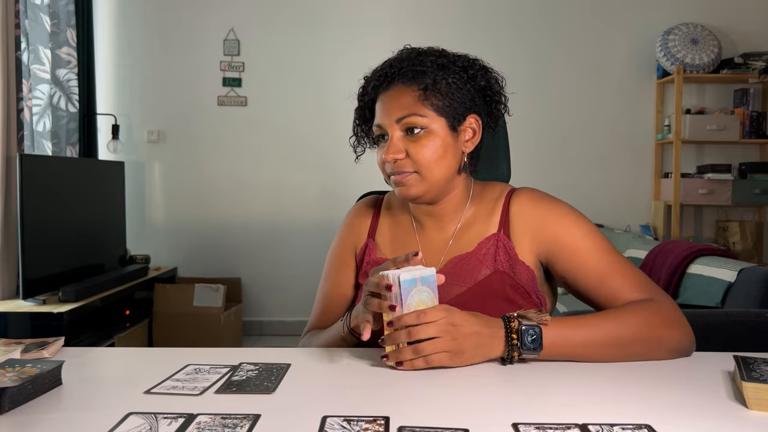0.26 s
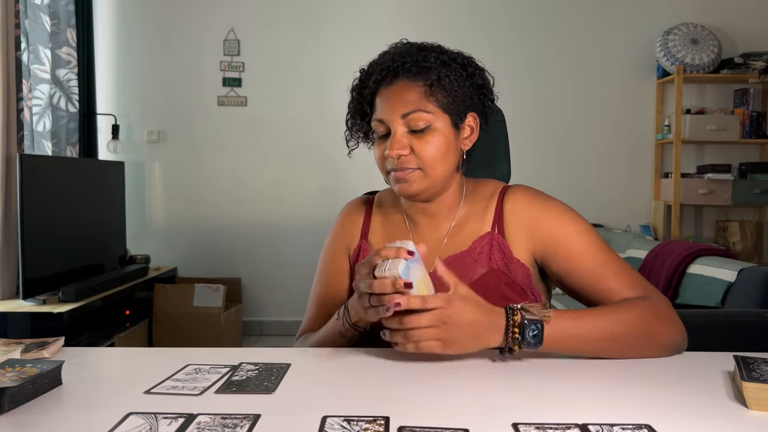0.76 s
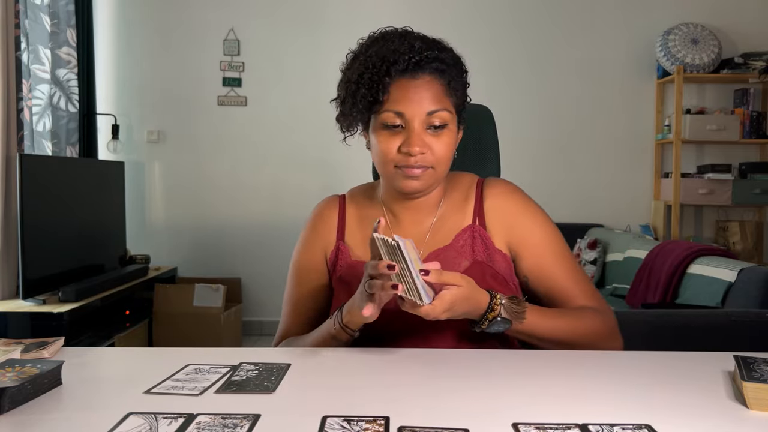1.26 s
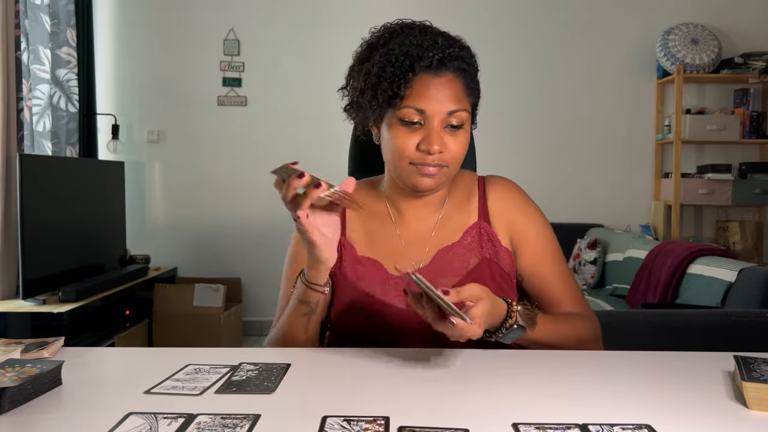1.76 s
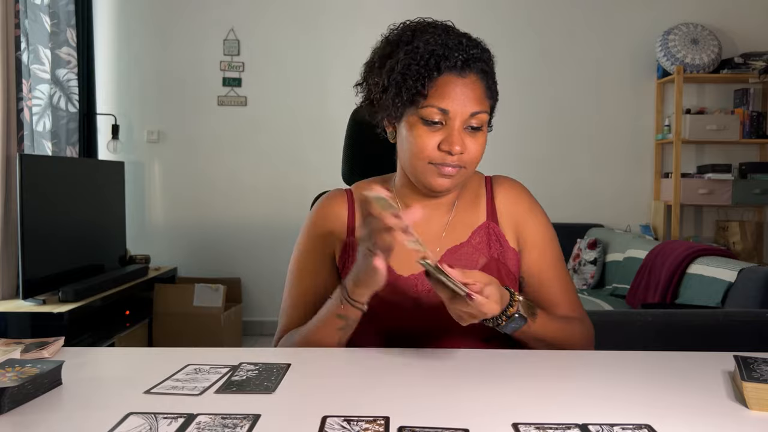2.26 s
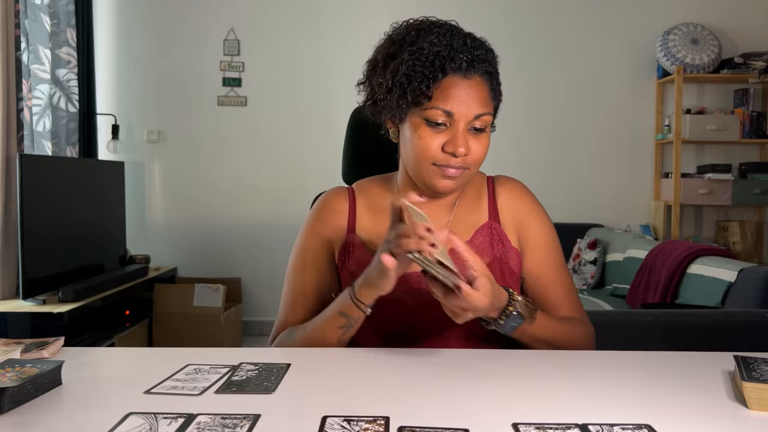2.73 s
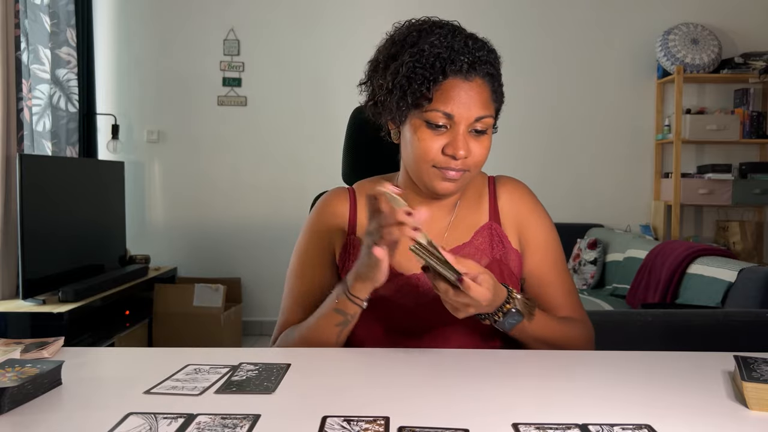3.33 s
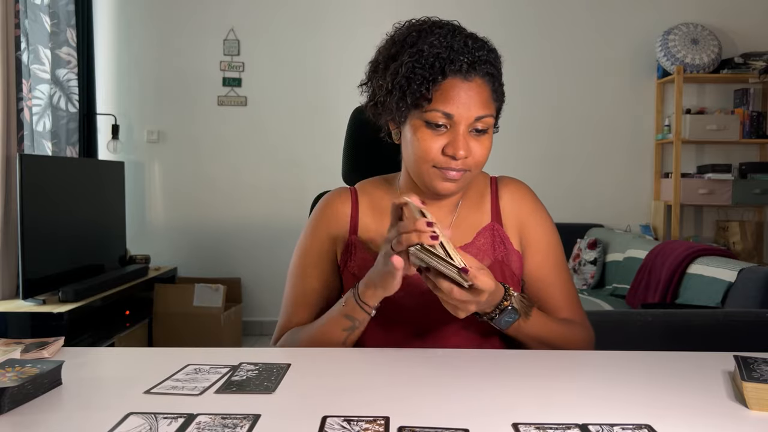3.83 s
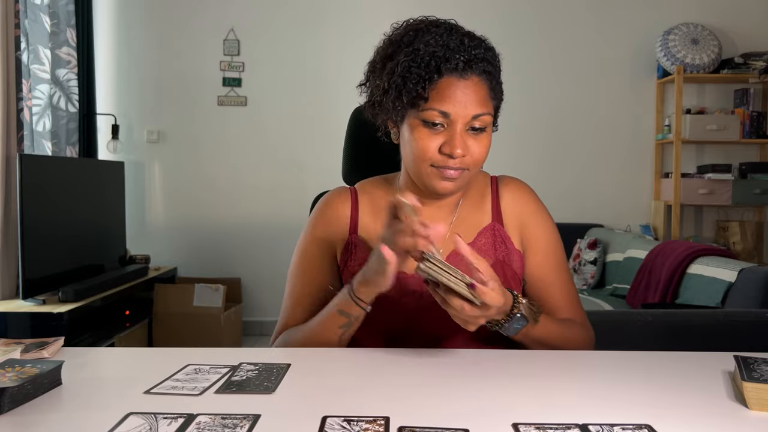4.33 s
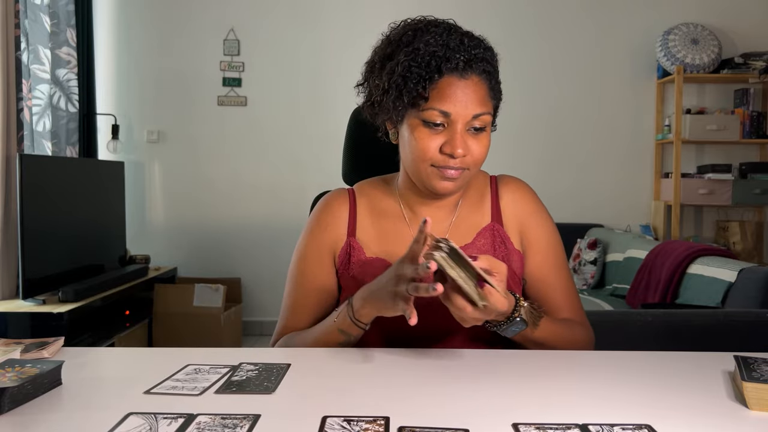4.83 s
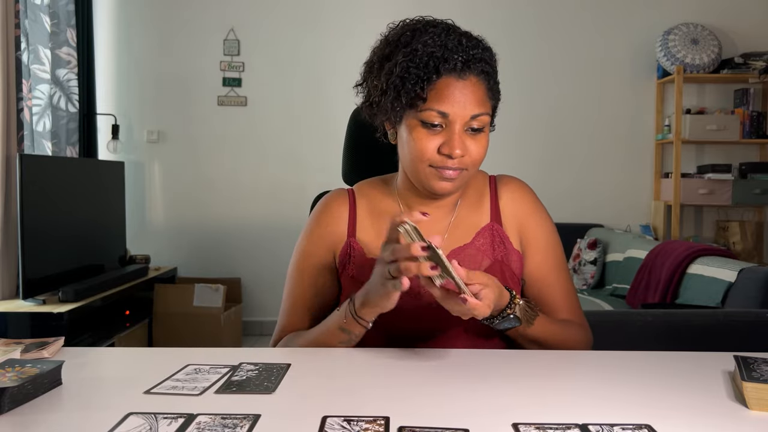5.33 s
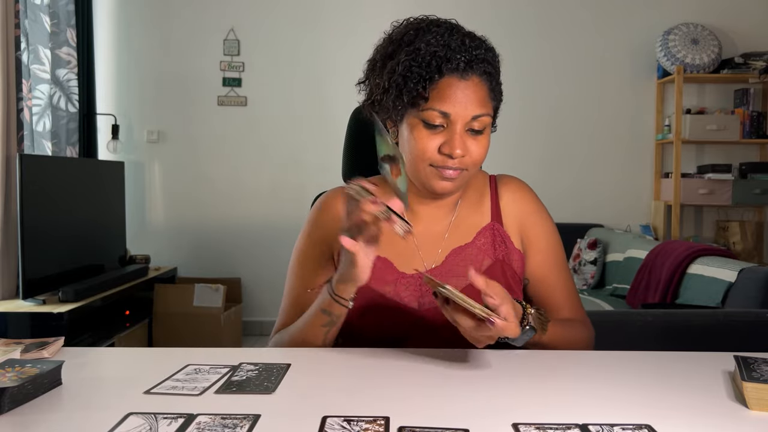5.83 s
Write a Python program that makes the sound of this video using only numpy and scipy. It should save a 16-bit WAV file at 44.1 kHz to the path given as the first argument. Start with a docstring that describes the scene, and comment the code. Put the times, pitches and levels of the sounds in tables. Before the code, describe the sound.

Soft clacks and dull rubbing of a squared deck, near silence, then a brisk uneven overhand shuffle of large cards in a small bare room.

```python
"""Overhand shuffle at a table

In a bare-walled living room, a deck of large cards is knocked square on a table, then shuffled overhand.
Strokes are grainy friction noise; packets slap down as a palm thud, an air-pocket pop and a paper crack.
Decaying noise and a few near reflections make the room ring after every slap and knock; the table booms.
A stereo pair of microphones hears the direct contacts a little earlier on the right.
A low rumble of noise and standing waves lies underneath, almost gone before the shuffle, then swelling."""
import sys
import numpy as np
from scipy import signal
from scipy.fft import rfft, irfft, next_fast_len
from scipy.io import wavfile
from scipy.ndimage import map_coordinates

SR = 44100
rng = np.random.default_rng(int(sys.argv[2]) if len(sys.argv) > 2 else 0)


def master_out(mix):
    """Clip the mix to full scale and print it as 16-bit PCM to the path in sys.argv[1]."""
    frames = np.transpose(np.atleast_2d(mix))
    ceiling = np.clip(frames, -1, 1)
    pcm = np.round(ceiling * 32767).astype(np.int16)
    wavfile.write(sys.argv[1], SR, pcm)


N = 268503
TIME = np.arange(N) / SR
LEFT_LAG_SAMPLES = 2    # sound reaches the left side this much later
SLIDE_GATE_DB = -62     # loose cards and faint ticks need at least this stroke level
MIDDLE_POCKET_HZ = 1000

# Packets landing on the deck. Each row: start in seconds, air pocket in Hz, pocket level in dB,
# card crack level in dB; both levels are relative.
SLAPS = [(1.7357, 700, -32, -46), (1.7503, 1210, -34.5, -29), (1.9683, 1170, -32.5, -33.5),
         (2.018, 980, -29.5, -31.5), (2.066, 1250, -42, -37), (2.2553, 1070, -31, -40),
         (2.2933, 1110, -34, -30.5), (2.3531, 1190, -26.5, -23.5), (2.522, 1130, -23, -22),
         (2.5264, 1080, -50, -27), (2.6333, 720, -33, -37), (2.6443, 840, -32, -48),
         (2.8653, 970, -36, -28), (2.8705, 1120, -32, -27), (2.8912, 820, -26.5, -38),
         (3.0758, 1150, -19.5, -18), (3.1872, 700, -34.5, -30.5), (3.3463, 1180, -42, -28.5),
         (3.3598, 750, -26.5, -27.5), (3.3983, 1060, -32, -24.5), (3.5912, 1100, -25.5, -24.5),
         (3.6704, 1270, -55, -31.5), (3.7006, 980, -28.5, -30), (3.8568, 930, -39, -20.5),
         (3.8649, 1260, -21.5, -31), (3.8872, 1240, -18, -22), (3.9676, 1030, -30, -34),
         (4.1354, 920, -29, -28.5), (4.1538, 800, -21.5, -24), (4.1624, 990, -35, -26),
         (4.2466, 990, -38, -30), (4.4032, 760, -33, -33), (4.4269, 1110, -31, -41),
         (4.5236, 1130, -25.5, -27.5), (4.6831, 1050, -8.5, -14.5), (4.6885, 950, -25.5, -18.5),
         (4.7346, 750, -27, -26.5), (4.7636, 960, -18, -20), (5.4513, 660, -47, -43),
         (5.4761, 690, -21.5, -31), (5.4839, 1140, -16, -20), (5.4895, 900, -19, -23.5),
         (5.6728, 930, -25.5, -29.5), (5.6861, 1040, -14.5, -19), (5.6932, 1210, -38, -16.5),
         (5.7012, 960, -16, -32), (5.7145, 930, -23, -38), (5.7683, 1230, -32, -25),
         (5.8019, 1010, -45, -26.5), (5.9497, 720, -19, -15), (6.0359, 820, -25.5, -23)]
# Bending resonances of a loose packet. Each row: pitch in Hz, width in Hz, relative level in dB.
PACKET_MODES = [(1790, 240, 5.5), (2385, 500, 5), (3160, 820, 5), (5540, 940, 3)]


def slaps(slide):
    """Packets and loose cards land, squeezing out air and ringing in broad bending resonances."""
    landings = [*SLAPS, *loose_cards(slide)]
    return card_hits(landings, PACKET_MODES, crack_top_hz=6070, contact_s=.0011, patter=0.55,
                     settle_s=.004, settle_db=-20, pocket_width_hz=520, pocket_db=-0.5,
                     thud_db=-7, crack_db=0.5, tick_db=-11)


LOOSE_CARDS_PER_S, LOOSE_CARD_DB = 11, -5.5   # rate while cards slide; level relative to the sliding


def loose_cards(slide):
    """Light landings at random moments, following the strength of the sliding; rows as in SLAPS."""
    sliding_now = slide > from_db(SLIDE_GATE_DB)
    at = np.flatnonzero((rng.random(N) < LOOSE_CARDS_PER_S / SR) & sliding_now)
    pitch, air, crack = rng.standard_normal((len(at), 3)).T
    pocket_hz = MIDDLE_POCKET_HZ * np.exp(.15 * pitch)
    db = 20 * np.log10(slide[at]) + LOOSE_CARD_DB
    return list(zip(TIME[at], pocket_hz, db + 3 * air, db - 1 + 3 * crack))


HIT_S = .004              # a part at 0 dB has the energy of rms 1 over this time
THUD_DB_PER_OCTAVE = 11   # a bigger, lower air pocket also thuds more in the palm


def card_hits(rows, modes, crack_top_hz, contact_s, patter, settle_s, settle_db,
              pocket_width_hz, pocket_db, thud_db, crack_db, tick_db):
    """A packet lands: the palm thuds, trapped air pops, cards crack, edges tick, loose cards settle."""
    out, t = np.zeros(N), TIME[:SR // 20]
    firm = (t == 0).astype(float)
    envelope = np.exp(-t / contact_s) + from_db(settle_db) * np.exp(-t / settle_s)
    sharp = np.exp(-t / .0004)
    crack_top = signal.butter(8, crack_top_hz, fs=SR, output="sos")
    for s, pocket_hz, pocket, crack in rows:
        patter_noise, tick_noise = rng.standard_normal((2, len(t)))
        # one firm push plus the patter of single cards
        push = firm + patter * energy_one(patter_noise * envelope)
        # every grip tunes the packet a little differently
        stiffness = 1 + 0.043 * rng.standard_normal()
        bend = np.zeros(len(t))
        for k, (hz, width_hz, db) in enumerate(modes):
            gain = (-1) ** k * from_db(db + 2 * rng.standard_normal())
            bend += gain * resonance(push, hz * stiffness, width_hz)
        bend = signal.sosfilt(crack_top, bend)
        thud = pocket + THUD_DB_PER_OCTAVE * np.log2(MIDDLE_POCKET_HZ / pocket_hz)
        palm = from_db(thud + thud_db) * energy_one(band(push, 300, 796))
        pop = resonance(push, pocket_hz, pocket_width_hz)
        air = from_db(pocket + pocket_db) * energy_one(band(pop, 471, 1300))
        paper = from_db(crack + crack_db) * energy_one(band(bend, 1400, 4800))
        tick = energy_one(tick_noise * sharp) + firm
        edges = from_db(crack + tick_db) * energy_one(band(tick, 5000, 16000))
        add(out, s, np.sqrt(HIT_S * SR) * (palm + air + paper + edges))
    return out


# Strokes of the hand, cards sliding over each other. Each row: landing time in seconds, rise in seconds,
# hold in seconds, card friction level in dB, palm rub level in dB; both levels are relative.
STROKES = [(1.706, 0.054, 0.017, -43.5, -65), (1.744, 0.056, 0.0057, -41.5, -39),
           (1.963, 0.025, 0.12, -40.5, -38), (2.248, .02, 0.13, -35, -37.5), (2.522, 0.01, 0.13, -35, -35),
           (2.792, 0.025, 0.11, -34, -37.5), (3.065, 0.016, 0.13, -31.5, -36.5),
           (3.317, 0.02, 0.098, -31.5, -34.5), (3.587, 0.0086, 0.15, -32.5, -33.5),
           (3.856, 0.01, .11, -33.5, -31.5), (4.135, 0.019, 0.12, -32.5, -34),
           (4.4, 0.0098, 0.14, -34.5, -39.5), (4.677, 0.0056, 0.05, -27, -27.5),
           (4.758, .006, .006, -31.5, -29.5), (4.927, 0.077, .12, -50, -48), (5.124, 0.12, .25, -58, -58),
           (5.445, 0.17, .03, -45.5, -45.5), (5.483, 0.043, 0.0053, -26.5, -26),
           (5.658, .015, 0.016, -41, -34.5), (5.684, 0.04, 0.1, -30, -29.5),
           (5.949, 0.0069, 0.006, -30, -28.5), (6.033, .02, 0.011, -47, -38.5)]
STROKE_RISE_DB = 36.5                        # swell over the rise time
STROKE_BITE_DB, STROKE_BITE_S = 4.1, 0.01    # extra grip as the packet lands, and its decay
STROKE_SAG_DB_PER_S, STROKE_EASE_DB = 14.5, 1   # steady sag, and a dip of pressure in mid-hold
SLIDE_RELEASE_DB_PER_S, PALM_RELEASE_DB_PER_S = 189, 149


def stroke_gains():
    """Friction and palm rub over time: every stroke rises, bites, eases in the middle and is released."""
    s, rise_s, hold_s, slide_db, palm_db = np.transpose(STROKES)[..., None]
    t = TIME[::20]   # a coarse clock is enough for gains
    age, hold_s = t - s, np.maximum(hold_s, 1 / SR)
    held = np.clip(age, 0, hold_s)
    released = np.maximum(age - hold_s, 0)
    rise = STROKE_RISE_DB * np.minimum(age, 0) / rise_s
    bite = STROKE_BITE_DB * np.exp(-held / STROKE_BITE_S)
    sag = STROKE_SAG_DB_PER_S * held + STROKE_EASE_DB * np.sin(np.pi * held / hold_s) ** 2
    shape = rise + bite - sag

    def strongest(db, release):
        """The strongest stroke sets the gain at each moment."""
        loudest_db = np.max(db + shape - release * released, axis=0)
        return np.interp(TIME, t, from_db(loudest_db))

    return strongest(slide_db, SLIDE_RELEASE_DB_PER_S), strongest(palm_db, PALM_RELEASE_DB_PER_S)


# Colour of card faces sliding. Each row: frequency in Hz, relative gain in dB.
CARD_SLIDE = [(300, -15.5), (900, -18.5), (1600, -4.5), (2400, -2), (3500, -3), (4500, 2.5), (6000, 1),
              (8200, 3.5), (12000, -3), (16000, -14.5)]
# Colour of the deck rubbing in the palm. Each row: frequency in Hz, relative gain in dB.
PALM_RUB = [(100, -13.5), (250, -3), (500, -2), (800, -5.5), (1200, -4.5), (1600, 1), (3000, -22)]


def sliding(slide, palm, slide_db, palm_db):
    """Card faces swish over each other while the deck rubs in the palm."""
    swish = from_db(slide_db) * slide * friction(CARD_SLIDE, grain_db=5.0, catches_per_s=16000)
    # the card edges grip and slip, so the top of the hiss comes in quick surges
    surge_times = np.arange(300) / 45
    surge = from_db(np.interp(TIME, surge_times, rng.normal(-2, 4.5, 300)))
    top = signal.sosfilt(signal.butter(1, 9000, "high", fs=SR, output="sos"), swish)
    swish = swish + (surge - 1) * top
    rub = from_db(palm_db) * palm * friction(PALM_RUB, grain_db=2.0, catches_per_s=4000)
    return spread(swish, likeness=0.19) + spread(rub, likeness=0.33)


# Single card corners snapping free. Each row: start in seconds, relative level in dB.
FLICKS = [(.858, -34.5), (1.994, -33.5), (2.351, -23), (2.521, -26), (2.595, -19), (2.936, -26.5),
          (3.075, -28), (3.589, -23), (4.293, -25), (4.763, -20), (5.301, -38)]
FLICK_DECAY_S = 0.0013   # a corner buzzes for a moment as it snaps free
FAINT_TICKS_PER_S = 26   # while the cards slide


def flicks(slide, snap_db, faint_db):
    """Corners snap free in short bright bursts; faint ones tick at random, louder in strong sliding."""
    sliding_now = slide > from_db(SLIDE_GATE_DB)
    born = (rng.random(N) < FAINT_TICKS_PER_S / SR) & sliding_now
    clicks = born * from_db(faint_db + rng.uniform(-9, 0, N)) * slide ** .35
    t = TIME[:SR // 50]
    for s, db in FLICKS:
        buzz = rng.standard_normal(len(t)) * np.exp(-t / FLICK_DECAY_S)
        add(clicks, s, from_db(db + snap_db) * energy_one(buzz))
    bright = signal.butter(2, 8000, "high", fs=SR, output="sos")
    return signal.sosfilt(bright, clicks + 1e-18)


# The hand lifts a packet off the deck. Each row: time of the peak in seconds, pitch in Hz, level in dB.
SCUFFS = [(1.597, 1050, -79), (1.674, 1080, -37), (5.342, 2110, -51.5), (5.41, 1110, -42.5),
          (5.452, 2900, -40.5)]
SCUFF_RISE_S, SCUFF_DECAY_S, SCUFF_WIDTH_HZ = 0.015, 0.029, 630   # width of each of two resonances


def scuffs():
    """Brief soft rubbing that swells and fades in the hollow between packet and deck."""
    out = np.zeros((2, N))
    for s, hz, db in SCUFFS:
        before, after = np.minimum(TIME - s, 0), np.maximum(TIME - s, 0)
        envelope = np.exp(-(before / SCUFF_RISE_S) ** 2 - after / SCUFF_DECAY_S)
        hollow = resonance(rng.standard_normal((2, N)), hz, SCUFF_WIDTH_HZ)
        hollow = resonance(hollow, hz, SCUFF_WIDTH_HZ)
        out += from_db(db) * envelope * rms_one(hollow)
    return spread(out, likeness=0.67)


# The deck's edges knocked on the table. Each row: start in seconds, air pocket in Hz, pocket level in dB, #
# card crack level in dB; both levels are relative.
KNOCKS = [(.0051, 1210, -30, -27), (.0317, 1170, -40, -28), (.085, 700, -32, -32), (.0921, 720, -30, -33),
          (.1214, 760, -25.5, -35), (.1245, 1080, -21, -48), (.1363, 1060, -21.5, -28.5),
          (.2255, 1030, -32.5, -31), (.2415, 1110, -30.5, -26), (.25, 950, -30, -28),
          (.2843, 1180, -34, -31), (.2912, 1040, -31, -24.5), (.3101, 1140, -35, -38.5),
          (.3528, 1000, -34, -32), (.36, 1020, -38, -28), (.4841, 1130, -36.5, -32.5),
          (.504, 1000, -34, -30), (.5684, 1090, -41, -33.5), (.5818, 1060, -35, -30),
          (.7272, 1080, -49, -40.5)]
# Bending resonances of the tightly held deck. Each row: pitch in Hz, width in Hz, relative level in dB.
DECK_MODES = [(1670, 120, 6), (2100, 170, 6), (2385, 120, 6), (3060, 460, -5.5), (3720, 140, -13.5)]


def knocks():
    """The deck's edges strike in very short contacts; held tight, it bends in narrower resonances."""
    return card_hits(KNOCKS, DECK_MODES, crack_top_hz=4300, contact_s=0.00023, patter=0.77,
                     settle_s=0.0031, settle_db=-17.5, pocket_width_hz=500, pocket_db=2.5,
                     thud_db=-7, crack_db=1, tick_db=-42.5)


# Cards rubbing as the deck is squared, dull in the treble. Each row: time in seconds,
# friction level in dB, crisp edge hiss level in dB; both levels are relative.
SQUARING = [(0.0, -21.5, -32), (.19, -31, -56), (.35, -32.5, -55.5), (.47, -47, -81), (.57, -38, -73),
            (.64, -42.5, -63), (.8, -57.5, -65.5), (.95, -59.5, -61), (1.13, -86.5, -97)]
# Colour of the dull rubbing. Each row: frequency in Hz, relative gain in dB.
DULL_RUB = [(100, -48.5), (330, -3), (550, -2), (1050, 2.5), (1500, 8.5), (2100, 0.5), (3800, -7),
            (4600, -16), (6500, -30.5), (10000, -65.5)]
# Colour of the crisp card edges. Each row: frequency in Hz, relative gain in dB.
EDGE_HISS = [(2500, -8.5), (4500, 7.5), (6000, -0.5), (7500, -10), (9500, -5), (12000, -18.5),
             (14000, -29.5), (16000, -42)]


def squaring(rub_db, hiss_db):
    """Dull, grainy rubbing and crisp edge hiss, fading unevenly as the deck is squared."""
    rub, hiss = gains_in_time(SQUARING)
    dull = from_db(rub_db) * rub * friction(DULL_RUB, grain_db=-0.5, catches_per_s=1700)
    crisp = from_db(hiss_db) * hiss * friction(EDGE_HISS, grain_db=3.5, catches_per_s=17000)
    return spread(dull + crisp, likeness=0.17)


# The deck bumps the table. Each row: start in seconds, relative level in dB.
BUMPS = [(0.12, -30), (0.244, -35), (0.369, -39)]
# Resonances of the table top. Each row: pitch in Hz, relative level in dB, undamped 60 dB decay in seconds.
TABLE_MODES = [(135.8, -6, 0.5), (315, 1, 0.16), (348, -10, 0.63), (618, -4.5, 0.24), (700, -7, 0.52)]
# the hands come to rest after each bump and damp the table: when it begins, and by how much
TABLE_FREE_S, TABLE_DAMPED_DB = .05, 8


def table_bumps(level_db):
    """The table top booms in decaying sine modes under the soft weight of the deck."""
    out, t = np.zeros(N), TIME[:SR]
    damping = np.clip(2 * (t / TABLE_FREE_S - 1), 0, 1)
    soft_onset = 1 - np.exp(-t / 0.006)
    for s, db in BUMPS:
        ring = np.zeros(len(t))
        for hz, mode_db, t60 in TABLE_MODES:
            gain = from_db(mode_db + rng.normal(0, 1))   # each bump excites the modes differently
            ring += gain * np.sin(2 * np.pi * hz * t) * np.exp(-np.log(1000) * t / t60)
        add(out, s, from_db(db + level_db) * ring * from_db(-TABLE_DAMPED_DB * damping) * soft_onset)
    return out


# Decay of the room. Each row: frequency in Hz, time to fall 60 dB in seconds.
ROOM_T60 = [(125, 0.3), (500, 0.56), (1200, 0.51), (3000, 0.43), (7000, 0.6), (14000, 0.1)]
# Strength of the room's tail. Each row: frequency in Hz, relative level in dB.
ROOM_COLOUR = [(125, 13.5), (500, -0.5), (1100, -3.5), (2200, -0.5), (5000, -2.5), (8000, 6), (12000, -2)]
# Left-right likeness of the tail. Each row: frequency in Hz, likeness from 0 to 1.
ROOM_LIKENESS = [(150, 0.45), (600, 0.15), (2000, 0.16), (6000, 0.24)]
# Near reflections off table, body and screen. Each row: delay in milliseconds, left level in dB,
# right level in dB; the treble is softened afterwards.
ECHOES = [(1.6, -22, -7), (2.4, -11.5, -29), (4.7, -27.5, -10.5), (7.3, -21, -8)]
SCATTER_TOP_HZ, SCATTER_PER_S = 4500, 3000


def room(x, early_db, tail_db, early_s):
    """Direct sound a little from the right, dull near reflections and scatter, then a diffuse tail."""
    t = TIME[:SR * 3 // 4]
    edges = np.geomspace(80, 18000, 13)
    white = rng.standard_normal((2, 2, len(t)))
    tail = np.zeros((2, len(t)))
    for k, (low, high) in enumerate(zip(edges, edges[1:])):
        hz = np.sqrt(low * high)
        decay = np.exp(-np.log(1000) * t / at_hz(ROOM_T60, hz))
        noise = spread(band(white[k % 2], low, high), at_hz(ROOM_LIKENESS, hz))
        tail += from_db(at_hz(ROOM_COLOUR, hz)) * noise * decay
    tail = energy_one(tail * (1 - np.exp(-t / .008)))
    bounces = rng.standard_normal((2, len(t))) * (rng.random((2, len(t))) < SCATTER_PER_S / SR)
    scatter = spread(bounces, likeness=1.0) * np.exp(-t / early_s) * (t > .002)
    near = from_db(early_db) * energy_one(scatter)
    for ms, left_db, right_db in ECHOES:
        lag = round(ms * SR / 1000)
        near[0, lag + LEFT_LAG_SAMPLES] += from_db(left_db)
        near[1, lag] += from_db(right_db)
    # skin and cloth soak up the treble of the near reflections, so bright ticks stay sharp
    near = signal.sosfilt(signal.butter(2, SCATTER_TOP_HZ, fs=SR, output="sos"), near)
    response = near + from_db(tail_db) * tail
    response[0, LEFT_LAG_SAMPLES] += 1   # direct sound
    response[1, 0] += 1
    return signal.fftconvolve(x[None], response, axes=1)[:, :N]


# Course of the low room background. Each row: time in seconds, relative level in dB.
RUMBLE_LEVEL = [(0.0, -59), (.36, -61), (.6, -77), (.9, -69.5), (1.08, -90.5), (1.74, -89), (1.9, -55),
                (2.45, -57.5), (2.8, -45.5), (4.1, -44.5), (6.09, -43)]
# Colour of the rumble. Each row: frequency in Hz, relative gain in dB.
RUMBLE_COLOUR = [(22, -37), (32, -39.5), (42, 4.5), (75, -6.5), (101, -1), (155, -7), (205, -1.5),
                 (300, -13), (450, -20.5), (700, -47.5), (2000, -40), (12000, -49)]
# Standing waves of the room. Each row: pitch in Hz, width in Hz, level relative to the rumble in dB.
ROOM_MODES = [(100.6, 5.2, -8), (180, 27, -8), (210.8, 7, -6.5), (313.8, 15, -8)]


def rumble(level_db):
    """Low background noise that gathers in the room's standing waves, nearly alike on both sides."""
    level = gains_in_time(RUMBLE_LEVEL)[0]
    noise = coloured(rng.standard_normal((2, N)), RUMBLE_COLOUR)
    for hz, width_hz, db in ROOM_MODES:
        wave = resonance(rng.standard_normal((2, N)), hz, width_hz)
        noise = noise + from_db(db) * rms_one(wave)
    balance = from_db([[.7], [-.7]])   # slightly stronger on the left
    return from_db(level_db) * balance * level * spread(noise, likeness=0.84)


def friction(spectrum, grain_db, catches_per_s):
    """Card fibres catch and let go: dense clicks of uneven size, scattered to both sides."""
    sizes = from_db(grain_db * np.minimum(rng.exponential(1, (2, N)), 4))
    catches = rng.random((2, N)) < catches_per_s / SR
    clicks = catches * sizes * rng.standard_normal((2, N))
    return coloured(shifting_colour(clicks), spectrum)


PATCHY_DB = 4.5   # typical swing of a patch


def shifting_colour(x):
    """As the grip and the free length of the cards change, patches of the spectrum swell and fade."""
    hz, s, frames = signal.stft(x, SR, nperseg=512)
    # random heights on a grid of pitch and time, 22 steps a second
    place = np.meshgrid(7 * np.log2(1 + hz / 500), s * 22, indexing="ij")
    patches = map_coordinates(rng.standard_normal((40, 140)), place, order=1, mode="nearest")
    return signal.istft(frames * from_db(PATCHY_DB * patches), SR)[1][..., :N]


def spread(pair, likeness):
    """Blend two unrelated signals into left and right, the left slightly late."""
    alike = np.clip(likeness, 0, 1)
    mid = np.sqrt((1 + alike) / 2) * pair[0]
    side = np.sqrt((1 - alike) / 2) * pair[1]
    return np.array([np.roll(mid + side, LEFT_LAG_SAMPLES), mid - side])


def from_db(db):
    """Decibels to gain."""
    return 10 ** (np.asarray(db) / 20)


def rms_one(x):
    """Scale to rms 1."""
    return x / np.sqrt(np.mean(x ** 2) + 1e-20)


def energy_one(x):
    """Scale each channel to energy 1."""
    return x / np.sqrt(np.sum(x ** 2, axis=-1, keepdims=True) + 1e-20)


def gains_in_time(rows):
    """One gain curve per dB column, silent outside the rows."""
    s, *columns = np.transpose(rows)
    inside = (TIME >= s[0]) * (TIME <= s[-1])
    return [from_db(np.interp(TIME, s, db)) * inside for db in columns]


def at_hz(points, hz):
    """Read a table on a log-frequency axis."""
    f, value = np.transpose(points)
    return np.interp(np.log(np.maximum(hz, 1)), np.log(f), value)


def coloured(x, spectrum):
    """Filter a steady signal with a table of gains; rms 1."""
    size = next_fast_len(N)
    hz = np.arange(size // 2 + 1) * SR / size
    shaped = irfft(rfft(x, size) * from_db(at_hz(spectrum, hz)), size)
    return rms_one(shaped[..., :N])


def band(x, low_hz, high_hz):
    """Causal band-pass."""
    edges = [low_hz, min(high_hz, SR / 2 - 100)]
    return signal.sosfilt(signal.butter(2, edges, "band", fs=SR, output="sos"), x)


def resonance(x, hz, width_hz):
    """Two-pole resonance with gain close to 1 on top."""
    r = np.exp(-np.pi * width_hz / SR)
    feedback = [1, -2 * r * np.cos(2 * np.pi * hz / SR), r * r]
    return signal.lfilter(np.array([1, 0, -1]) * (1 - r * r) / 2, feedback, x)


def add(track, s, sound):
    """Mix a sound into a track at time s."""
    start = max(0, round(s * SR))
    part = sound[:max(0, N - start)]
    track[start:start + len(part)] += part


def scene():
    """Slaps, knocks and flicks ring in the room, over table bumps, friction and rumble."""
    slide, palm = stroke_gains()
    contacts = slaps(slide) + flicks(slide, snap_db=23.5, faint_db=3.5) + knocks()
    hits = room(contacts, early_db=-5, tail_db=-3, early_s=.008)
    rubbing = sliding(slide, palm, slide_db=5.0, palm_db=0.5) + scuffs()
    rubbing = rubbing + squaring(rub_db=-1, hiss_db=1.5)
    return hits + rubbing + table_bumps(level_db=8.0) + rumble(level_db=-1.5)


# Microphone peaks and dips. Each row: centre in Hz, nominal width in Hz, left gain in dB, right gain in dB.
MICROPHONE = [(1539, 170, -10.5, -6), (4650, 660, -15.5, 0), (9570, 820, -35, -29.5),
              (11830, 1400, 11, 6.5), (16650, 1900, -20, -14)]
BASS_CUT_HZ, TOP_CUT_HZ = 53, 16200


def record(dry):
    """The microphones colour the sound with a few peaks and dips; the deep bass and the top are cut."""
    bass_cut = signal.butter(6, BASS_CUT_HZ, "high", fs=SR, output="sos")
    channels = list(signal.sosfilt(bass_cut, dry))
    for hz, width_hz, *side_db in MICROPHONE:
        half_width = np.tan(np.pi * width_hz / SR)
        turn = -2 * np.cos(2 * np.pi * hz / SR)
        for k, db in enumerate(side_db):
            gain = from_db(db / 2)   # applied above and below the fraction, so the centre gets db
            above = [1 + half_width * gain, turn, 1 - half_width * gain]
            below = [1 + half_width / gain, turn, 1 - half_width / gain]
            channels[k] = signal.lfilter(above, below, channels[k])
    top_cut = signal.ellip(10, .2, 80, TOP_CUT_HZ, fs=SR, output="sos")
    return signal.sosfilt(top_cut, np.array(channels))


dry = scene()
out = record(dry)
master_out(out)
```